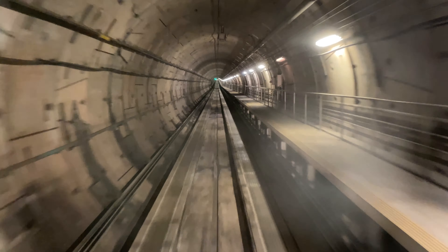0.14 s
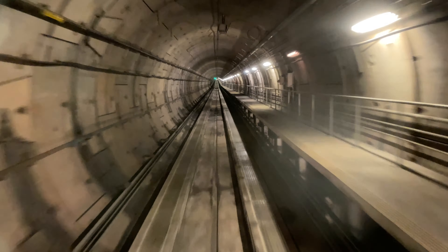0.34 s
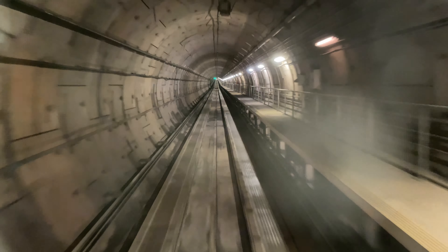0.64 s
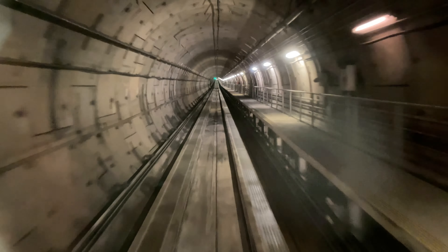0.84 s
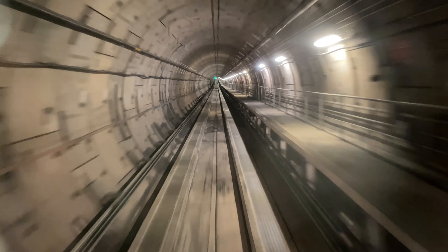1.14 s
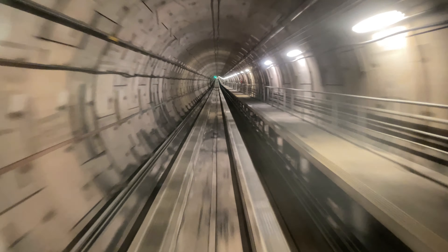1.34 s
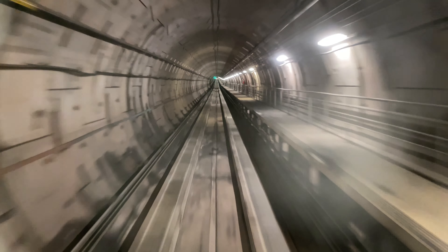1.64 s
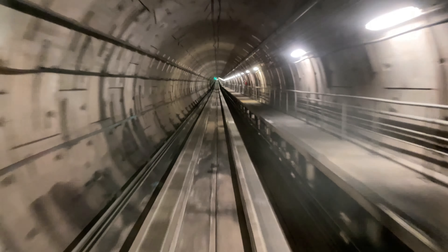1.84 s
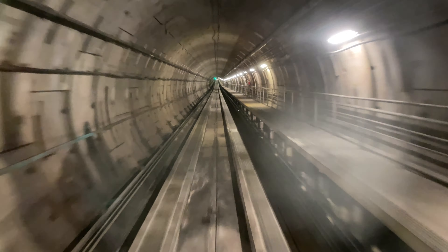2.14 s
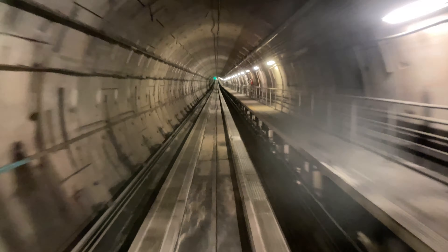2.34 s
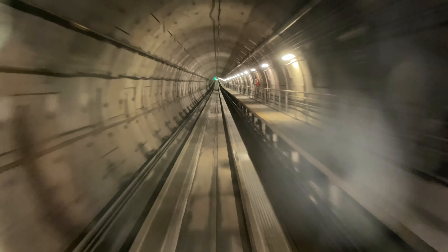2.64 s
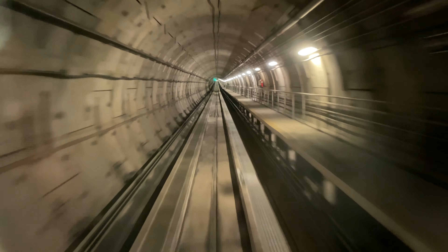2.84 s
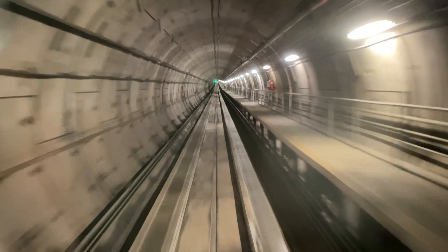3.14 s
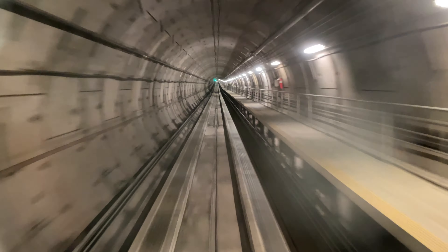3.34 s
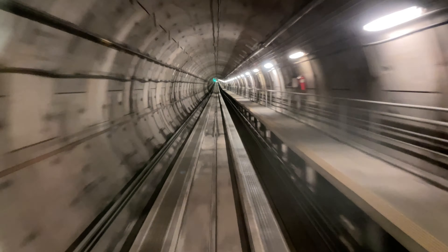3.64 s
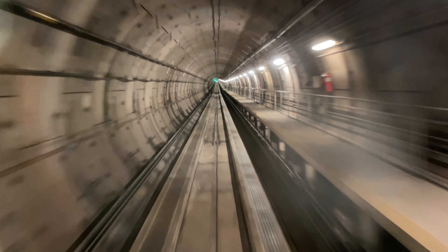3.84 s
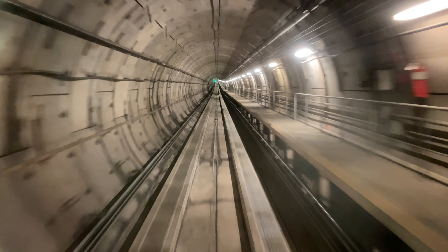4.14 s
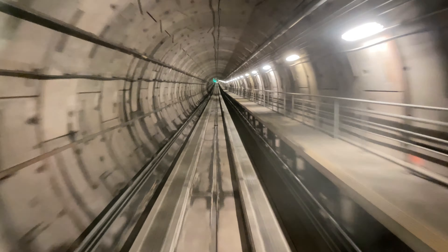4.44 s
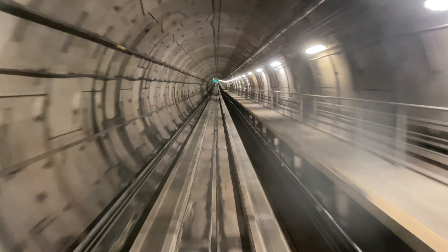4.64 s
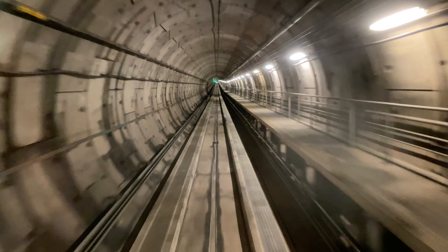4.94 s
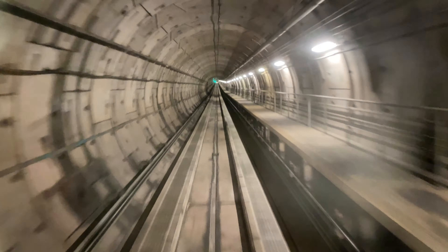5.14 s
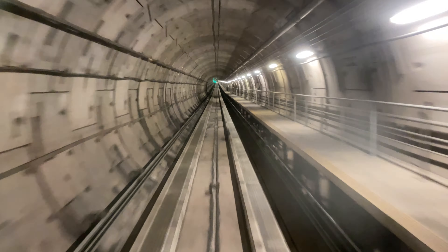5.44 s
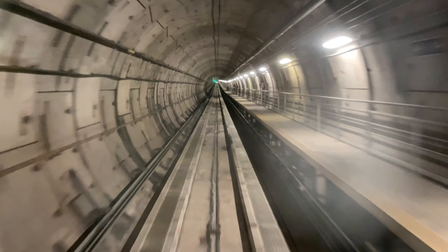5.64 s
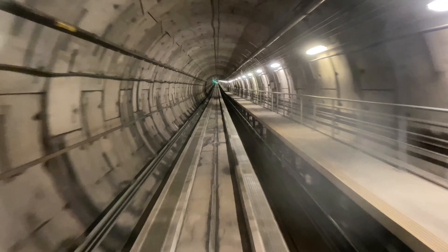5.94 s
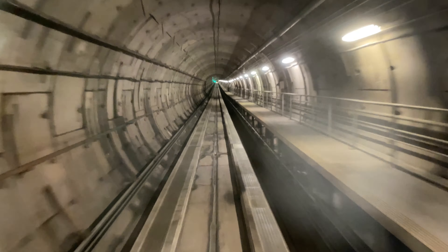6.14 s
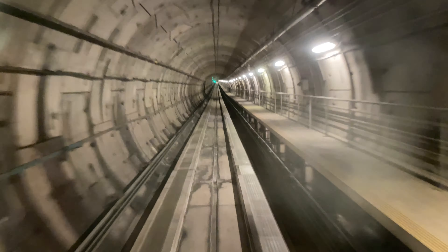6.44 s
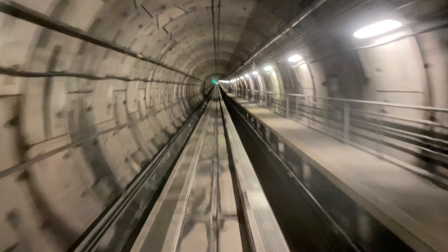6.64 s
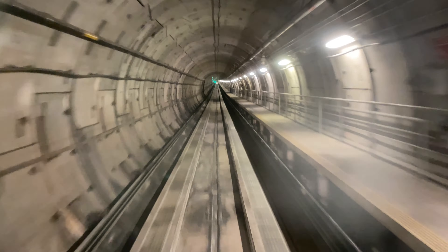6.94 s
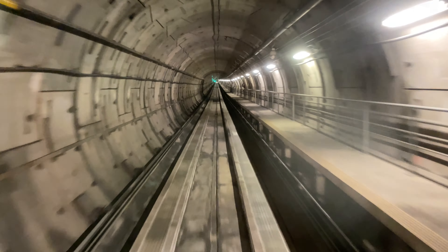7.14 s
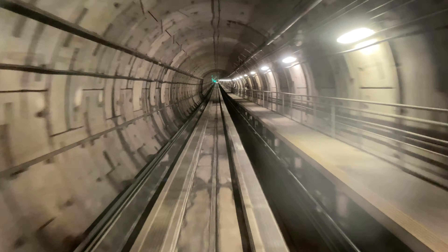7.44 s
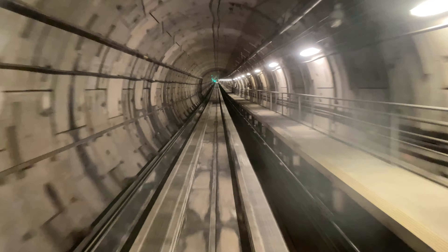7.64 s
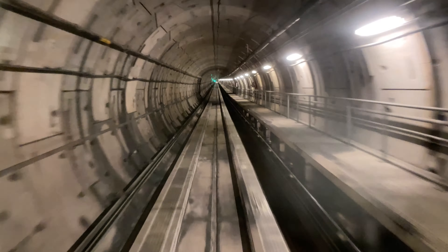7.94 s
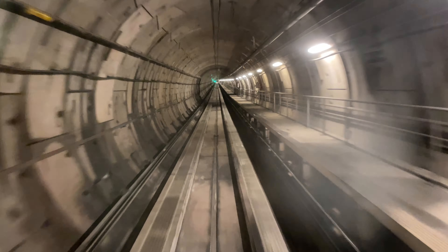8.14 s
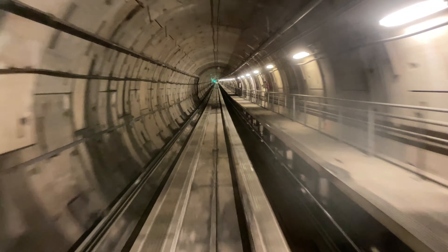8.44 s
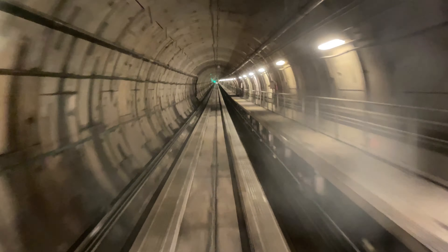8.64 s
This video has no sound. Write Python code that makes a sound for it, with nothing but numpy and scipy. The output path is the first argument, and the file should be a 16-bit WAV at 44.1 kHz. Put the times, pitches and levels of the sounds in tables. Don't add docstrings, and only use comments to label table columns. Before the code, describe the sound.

From 0 seconds, a deep, pressing cabin boom and muffled tunnel roar surround a phone at the front of a moving rubber-tyred train. Over them the tyres sing, a low hum near 215 Hz with stronger overtones, rough and wavering, gliding upward quickly until about 2.5 seconds. Two slightly different tyre pitches beat together early on. A steady fan hum swells now and then, and a low shaft drone throbs, strengthening after 1.7 seconds. Faint brushes from the power contact pass near 0.5, 1.5 and 4.4 seconds, with a tiny thin squeak near 3.2. From 4 seconds the pitch is almost level; the singing swells around 5 to 5.5 seconds while rumble and roar ease slightly. The shaft drone peaks near 6.7, then sinks. Fluttering tyre song, airy roar and very faint high hiss continue at cruise until an abrupt, softened stop near 8.8 seconds.

```python
import sys
import numpy as np
from scipy import signal
from scipy.fft import rfft, irfft, next_fast_len
from scipy.io import wavfile
from scipy.ndimage import uniform_filter1d, map_coordinates

SR = 44100
rng = np.random.default_rng(int(sys.argv[2]) if len(sys.argv) > 2 else 0)


def bounce(signal):
    frames = np.transpose(np.atleast_2d(signal))
    limited = np.clip(frames, -1, 1)
    pcm = np.round(limited * 32767).astype(np.int16)
    wavfile.write(sys.argv[1], SR, pcm)


def rack_gain(trim_db):
    fader = np.asarray(trim_db, float)
    return 10 ** (fader / 20)


N = 387638
T = np.arange(N) / SR
EDGE = 4096
SIZE = next_fast_len(N + 2 * EDGE)
HZ = np.fft.rfftfreq(SIZE, 1 / SR)
COARSE = 64

# t/s, running tyres f/Hz, driven tyres f/Hz
BLOCK_RATE = [(0.0, 216.1, 204.3), (0.8, 230.4, 216.2), (1.6, 240.5, 223.8), (2.4, 251.6, 231.5),
              (3.2, 255.3, 236.0), (4.0, 258.7, 237.6), (4.8, 261.4, 238.6), (5.6, 262.8, 242.3),
              (7.2, 263.7, 244.2), (8.79, 264.6, 245.6)]
# t/s, level/dB
EFFORT = [
    (0, 0),
    (2, -1),
    (4, -3),
    (5.2, -3),
    (5.9, -4.5),
    (8.79, -5),
]
# f/Hz, level/dB per Hz
BOOM_COLOUR = [(22, -28), (33, -14), (45, -1.5), (60, -2.5), (100, -5), (140, -16), (200, -40.5)]
# f/Hz, level/dB per Hz
RUMBLE_COLOUR = [(60, -25), (110, -0.5), (150, -3), (185, 1), (260, -5.5), (380, -8), (600, -16),
                 (1200, -27.5)]
# f/Hz, level/dB per Hz
ROAR_COLOUR = [(500, -4.5), (900, 3.5), (1400, 2.5), (1650, -3), (2050, -2), (2700, -14), (3300, -14),
               (4000, -21), (5150, -24), (5550, -28.5), (7200, -31.5), (9000, -29.5), (10600, -37.5),
               (14500, -52)]
# f/Hz, width/Hz, level/dB
CONVERTER_MODES = [(11400, 60, -69), (11500, 70, -71.5), (11200, 900, -72), (13200, 900, -76),
                   (6000, 200, -79)]
# f/Hz, width/Hz, level/dB
BRUSH_MODES = [(4600, 2500, -0.5), (5750, 250, -10)]
# f/Hz, width/Hz, level/dB
SQUEAK_MODES = [(13365, 70, -0.5)]
# t/s, length/s, level/dB
BRUSHES = [
    (.02, .05, -53.5),
    (.55, .14, -55),
    (.85, .05, -56),
    (1.5, 0.13, -52.5),
    (1.75, .1, -56.5),
    (3.15, 0.081, -58),
    (4.43, .1, -56.5),
    (5.58, .02, -57),
    (5.9, 0.092, -62),
    (7.9, .1, -61),
]
# t/s, length/s, level/dB
SQUEAKS = [
    (.5, .8, -79.5),
    (1.45, 0.33, -75.5),
    (2.1, .5, -79.5),
    (3.2, 0.25, -69),
    (3.8, 0.18, -75.5),
    (4.55, 0.43, -74),
    (5.2, 0.39, -79.5),
    (7.2, 1.6, -82.5),
]
# f/Hz, level/dB
FAN_LOWER = [(115.4, -36.5), (58, -37.5)]
# t/s, length/s, level/dB
FAN_SWELLS = [
    (.3, 0.69, -29.5),
    (1.0, .7, -33.5),
    (1.55, 0.42, -30.5),
    (2.0, 0.31, -32.5),
    (3.0, 1, -33.5),
    (4.55, .35, -34.5),
    (5.6, 0.27, -37.5),
    (6.9, 0.37, -35.5),
    (7.4, 0.13, -36.5),
    (8.45, 0.41, -31.5),
]
# t/s, level/dB
SHAFT_LOAD = [(0, -29), (.9, -25), (1.4, -28.5), (1.7, -22), (3.2, -20), (4.2, -24), (5.3, -20.5),
              (5.95, -27), (6.2, -20), (6.7, -18.5), (7.05, -32), (7.9, -27.5), (8.35, -34.5),
              (8.79, -27.5)]
# f/multiple of block rate, level/dB, fall below/dB per multiple, fall above/dB per multiple
ROLLING_HUMPS = [(1.029, -6, 51.5, 41.5), (1.86, -2.5, 70, 30), (2.04, 2, 43.5, 32.5), (2.24, -7, 29, 32),
                 (2.83, -8.5, 40.5, 22.5), (3.0, -0.5, 35, 30.5), (3.189, -5.5, 27.5, 44.5),
                 (3.969, -2, 30.5, 25), (4.93, -3.5, 27.5, 14.5), (5.9, -7.5, 16.5, 10)]
# f/Hz, level/dB
BODY_LOSS = [(200, -0.5), (420, -6), (560, 1.5), (850, 0.5), (1100, -3.5), (1400, -16), (2000, -27)]
# t/s, length/s, level/dB
RUNNING_HUM = [(.1, 0.41, -24), (.7, 0.6, -28.5), (1.2, 0.16, -32), (1.8, .6, -28.5), (2.3, 0.42, -28.5),
               (3.1, .5, -32.5), (4.55, 0.53, -28.5), (5.1, 0.53, -24), (6.75, 0.36, -36.5),
               (7.95, 0.33, -35.5), (8.55, 0.6, -30.5)]
# t/s, length/s, level/dB
RUNNING_SING = [(0.386, 0.16, -21), (0.99, 0.14, -22), (1.408, 0.23, -25.5), (1.8, 0.31, -23.5),
                (2.208, .3, -25), (2.375, 0.12, -20.5), (2.695, 0.34, -21.5), (3.057, 0.36, -19.5),
                (3.555, 0.46, -22.5), (4.252, .4, -23.5), (4.748, 0.26, -18.5), (5.0, .36, -16),
                (5.505, 0.58, -16.5), (6.096, 0.49, -24), (6.602, 0.63, -21), (7.374, 0.22, -20.5),
                (7.654, 0.29, -17.5), (7.855, 0.1, -22), (8.147, 0.21, -19.5), (8.438, 0.36, -20)]
# t/s, length/s, level/dB
RUNNING_THIRD = [
    (.8, 0.093, -35),
    (1.25, 0.099, -29),
    (1.582, .12, -23),
    (3.21, 0.22, -30.5),
    (3.815, 0.24, -28),
    (4.3, 0.39, -26),
    (5.5, 0.37, -29),
    (8.05, 0.14, -29.5),
]
# t/s, length/s, level/dB
DRIVEN_HUM = [
    (.8, 0.35, -31.5),
    (2.05, 0.44, -29),
    (2.75, 0.76, -26),
    (7.6, 0.35, -40),
]
# t/s, length/s, level/dB
DRIVEN_SING = [
    (.0, 0.17, -29.5),
    (.35, 0.4, -18),
    (.85, .4, -22),
    (2.35, 1, -28.5),
    (3.6, 0.37, -42),
    (4.4, 0.2, -34),
    (5.2, 0.48, -37),
    (8.0, 0.36, -37.5),
]
TREAD_WANDER = (.1, .35, 2.6)
# left minus right level/dB, left lead/rad, unrelated share/0-1
TREAD_PORTS = [(-2, -0.09, 0.4), (3.5, -0.15, 0.58), (5, 0.12, 0.6)]
# f/Hz, in step/-1..1, quarter turn
PORTS_LIKENESS = [(40, 0.95, 0), (70, 1, 0), (130, 0.99, 0.19), (251, 0.78, 0.13), (360, 0.47, 0.3),
                  (600, 0.4, -0.046), (783, 0.15, 0.068), (887, -0.61, 0.22), (1160, -0.58, 0.1),
                  (1420, -0.22, 0.037), (1970, 0.68, -0.033), (2170, .22, .08),
                  (2900, .4, .6), (3650, 0.22, .3), (3980, .5, .25), (5550, -.05, .1), (6300, 0.36, -.3),
              (7100, -0.053, -.1), (7760, -0.7, -.1), (8900, -0.95, 0), (10260, -0.5, .3), (10900, .3, .3),
              (11650, .6, .1), (11850, 0.83, 0)]
# f/Hz, left minus right level/dB
SHADE = [(60, -0.6), (200, -2), (340, -1.5), (520, 1), (1000, 2.5), (1900, 1), (2350, 7.5), (2950, 1.2),
         (3500, 6), (4400, 0.5), (5200, 2), (6700, 2), (8000, 1), (11400, 0.5)]


def curves(table):
    t, *columns = np.transpose(table)
    return [np.interp(T, t, column) for column in columns]


def shape(table, column=1):
    rows = np.array(table, float)
    return np.interp(np.log(HZ + 1), np.log(rows[:, 0]), rows[:, column])


def unit(x):
    return x / np.sqrt(np.mean(x ** 2))


def fine(slow):
    return np.interp(T, T[::COARSE], slow)


def walk(rate):
    hold, size = int(SR / COARSE / rate), len(T[::COARSE])
    steps = np.repeat(rng.standard_normal(size // hold + 1), hold)
    slewed = uniform_filter1d(uniform_filter1d(steps, hold), hold)
    return fine(1.22 * slewed[:size])


def swells(table):
    t = T[::COARSE]
    gain = 0 * t
    for centre, length, db in table:
        gain = gain + rack_gain(db) * np.exp(-(2 * (t - centre) / length) ** 2)
    return fine(gain)


def spread(pair):
    return rfft(np.pad(pair, ((0, 0), (EDGE, EDGE)), mode="reflect"), SIZE)


def noise(colour, flicker_db, flicker_hz):
    bins = rfft(rng.standard_normal((2, SIZE))) * rack_gain(shape(colour))
    first, last = int(np.log2(colour[0][0])), int(np.log2(colour[-1][0])) + 1
    out = 0
    for octave in range(first, last + 1):
        mask = np.cos(np.pi / 2 * np.clip(np.log2(HZ + 1) - octave, -1, 1)) ** 2
        band = irfft(bins * mask, SIZE)[:, :N]
        out = out + band * rack_gain(flicker_db * walk(flicker_hz))
    return unit(out)


def resonant(modes):
    power = 0
    for f, width, db in modes:
        peak = rack_gain(db) ** 2 / (np.pi * width / 2)
        power = power + peak / (1 + (2 * (HZ - f) / width) ** 2)
    bins = rfft(rng.standard_normal((2, SIZE))) * np.sqrt(power * SR / 2)
    return irfft(bins, SIZE)[:, :N]


def tone(hz, db, ports, wander, shimmer_hz=14):
    pan_db, lead, apart = ports
    phase = 2 * np.pi * np.cumsum(hz) / SR + wander * (walk(4) + 0.77 * walk(shimmer_hz))
    left_gain = rack_gain(pan_db / 2 + 8.0 * apart ** 2 * walk(shimmer_hz))
    right_gain = rack_gain(-pan_db / 2 + 4.9 * apart ** 2 * walk(shimmer_hz))
    left = np.sin(phase + lead + apart * walk(5)) * left_gain
    right = np.sin(phase - apart * walk(5)) * right_gain
    return np.sqrt(2) * rack_gain(db) * np.array([left, right])


def at_effort(full_db, db_per_db, effort):
    return rack_gain(full_db + db_per_db * effort)


def cabin_and_tunnel(effort):
    boom = noise(BOOM_COLOUR, flicker_db=1.0, flicker_hz=4.7)
    rumble = noise(RUMBLE_COLOUR, flicker_db=0.0, flicker_hz=5)
    roar = noise(ROAR_COLOUR, flicker_db=0.5, flicker_hz=7.4)
    bed = at_effort(-20, .9, effort) * boom
    bed += at_effort(-25.5, 0.96, effort) * rumble
    bed += at_effort(-30.5, 0.9, effort) * roar
    return bed


def converter(effort):
    return at_effort(6, 1.05, effort) * resonant(CONVERTER_MODES) * rack_gain(1.5 * walk(12))


def collector_shoe():
    brushing = resonant(BRUSH_MODES) * swells(BRUSHES)
    squeaking = resonant(SQUEAK_MODES) * swells(SQUEAKS)
    return brushing + squeaking


def fan(effort):
    gain = rack_gain(-38.5 + 1.2 * effort + 2.5 * walk(3.6)) + swells(FAN_SWELLS)
    hum = gain * tone(np.full(N, 175.3), 0, (-3, 0, .1), wander=0.36)
    for f, db in FAN_LOWER:
        hum = hum + tone(np.full(N, f), db + 1.8 * walk(2.3), (0, 0, .05), wander=0.35)
    return hum


def drive_shaft(block_hz):
    blocks_per_turn, throb_db, throb_rad = 95.8, 2, -.2
    turn = 2 * np.pi * np.cumsum(block_hz) / SR / blocks_per_turn
    throb = throb_db * np.cos(turn + throb_rad)
    load, = curves(SHAFT_LOAD)
    return tone(.175 * block_hz, load + throb, (0, 0, .015), wander=.22)


def rolling(block_hz, effort):
    steps = 24
    place = np.cumsum(block_hz) / SR * steps
    size = next_fast_len(int(place[-1]) + 8)
    multiple = np.fft.rfftfreq(size, 1 / steps)
    power = 0
    for centre, db, below, above in ROLLING_HUMPS:
        slope = np.where(multiple < centre, below, above)
        power = power + rack_gain(db - slope * abs(multiple - centre)) ** 2
    track = irfft(rfft(rng.standard_normal((2, size))) * np.sqrt(power), size)
    outside = np.array([map_coordinates(lane, [place], order=3) for lane in track])
    inside = irfft(spread(outside) * rack_gain(shape(BODY_LOSS)), SIZE)[:, EDGE:EDGE + N]
    return at_effort(-16.5, 0.8, effort) * unit(inside) * rack_gain(1.0 * walk(6))


def tread(block_hz, in_step, rest_db, effort):
    song = 0
    for k, (table, db) in enumerate(zip(in_step, rest_db)):
        gain = rack_gain(db + effort + 4.5 * walk(4)) + swells(table)
        line = tone((k + 1) * block_hz, 0, TREAD_PORTS[k], wander=TREAD_WANDER[k])
        song = song + gain * line
    return song


def tyres(running_hz, driven_hz, effort):
    running = tread(running_hz, (RUNNING_HUM, RUNNING_SING, RUNNING_THIRD), (-36.5, -35, -32.5), effort)
    driven = tread(driven_hz, (DRIVEN_HUM, DRIVEN_SING, []), (-42, -38.5, -40.5), effort)
    return running + driven


def at_ports(pair):
    a, b = spread(pair)
    table = PORTS_LIKENESS
    like = shape(table) - 1j * shape(table, column=2)
    like = like / np.maximum(abs(like), 1)
    unlike = np.sqrt(np.maximum(1 - abs(like) ** 2, 0))
    tilt = rack_gain(shape(SHADE) / 2)
    right = like * a + unlike * b
    return irfft(np.array([a * tilt, right / tilt]), SIZE)[:, EDGE:EDGE + N]


def scene():
    running_hz, driven_hz = curves(BLOCK_RATE)
    effort, = curves(EFFORT)
    field = cabin_and_tunnel(effort) + converter(effort) + collector_shoe()
    field += rolling(running_hz, effort)
    lines = fan(effort) + drive_shaft(running_hz) + tyres(running_hz, driven_hz, effort)
    return at_ports(field) + lines


def top_cut(x):
    return signal.sosfilt(signal.butter(12, 14500, fs=SR, output="sos"), x)


def record(dry):
    rounded = np.tanh(0.58 * dry) / 0.62
    stop = np.sin(np.pi / 2 * np.clip((T[-1] - T) / .012, 0, 1)) ** 2
    return top_cut(rounded * stop)


dry = scene()
out = record(dry)
bounce(out)
```